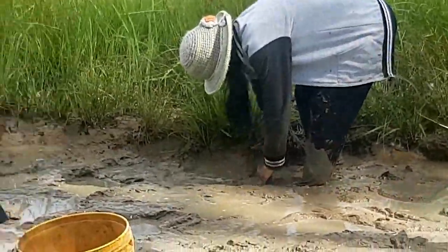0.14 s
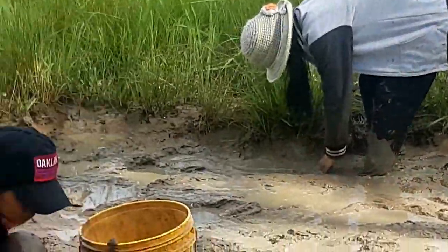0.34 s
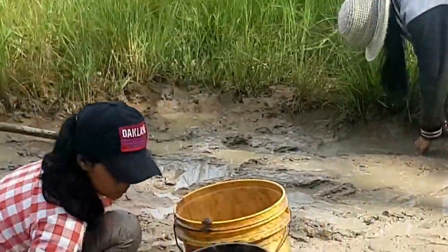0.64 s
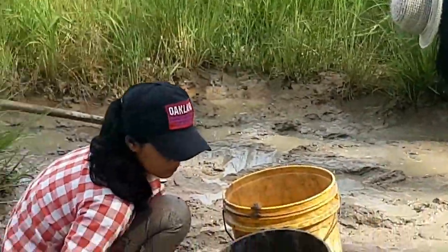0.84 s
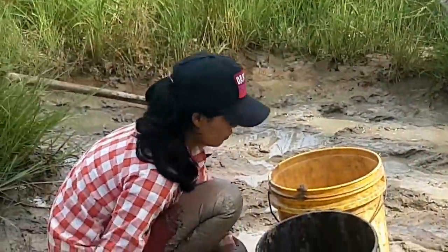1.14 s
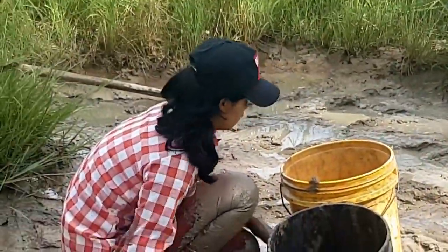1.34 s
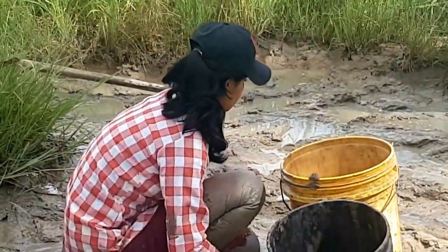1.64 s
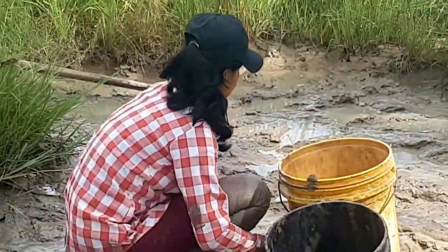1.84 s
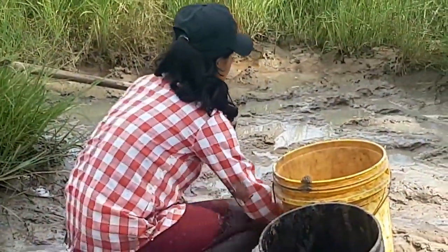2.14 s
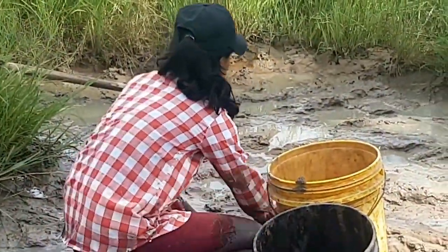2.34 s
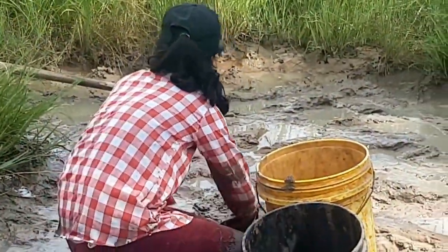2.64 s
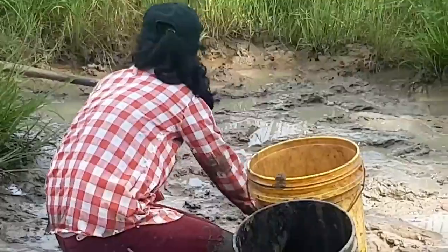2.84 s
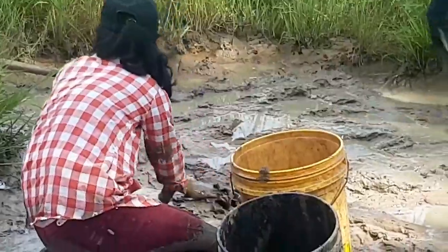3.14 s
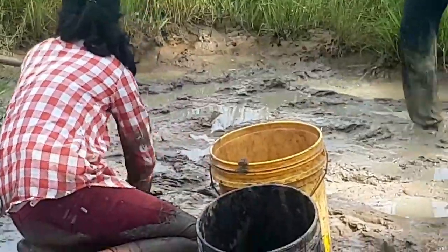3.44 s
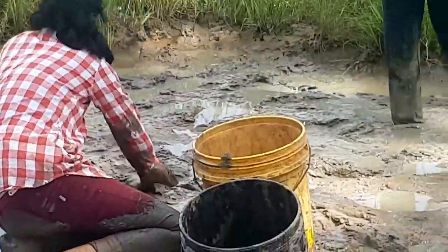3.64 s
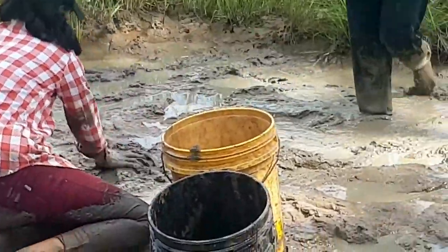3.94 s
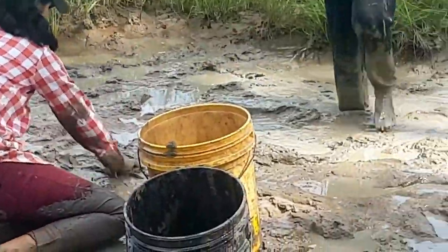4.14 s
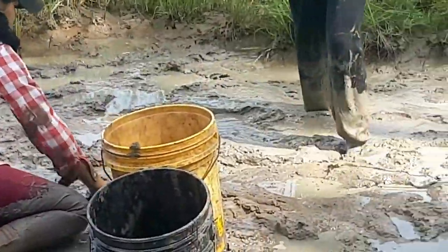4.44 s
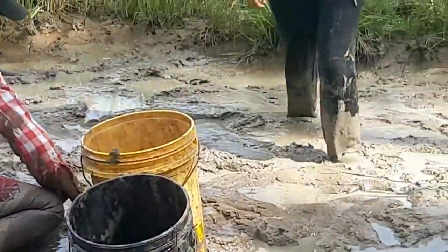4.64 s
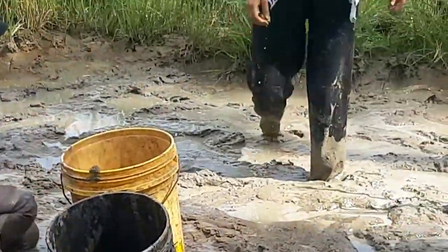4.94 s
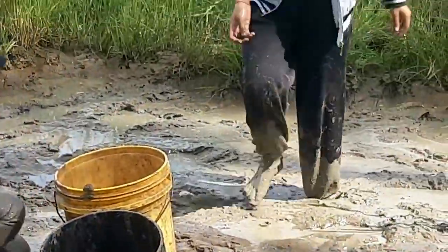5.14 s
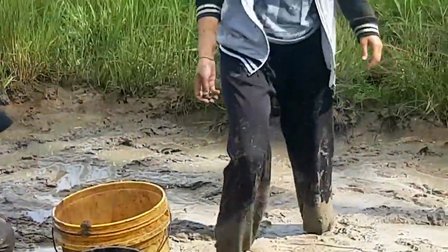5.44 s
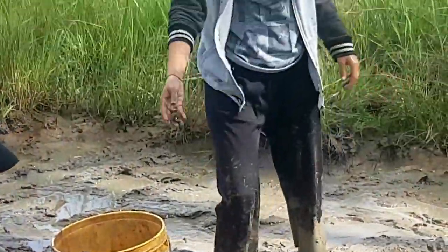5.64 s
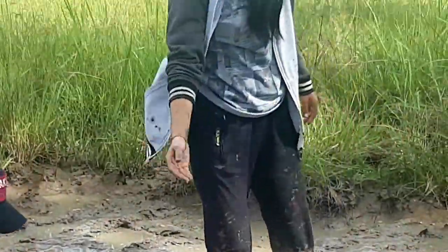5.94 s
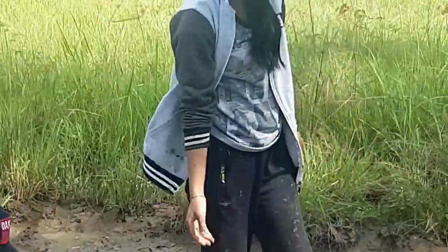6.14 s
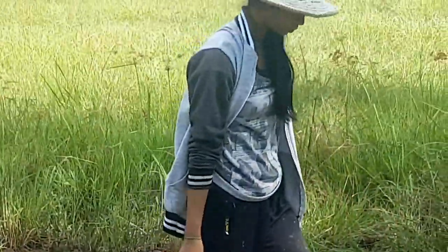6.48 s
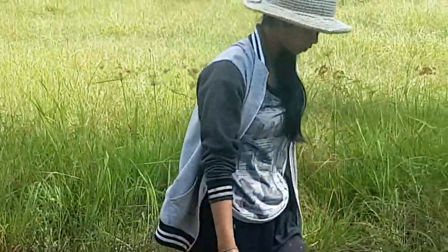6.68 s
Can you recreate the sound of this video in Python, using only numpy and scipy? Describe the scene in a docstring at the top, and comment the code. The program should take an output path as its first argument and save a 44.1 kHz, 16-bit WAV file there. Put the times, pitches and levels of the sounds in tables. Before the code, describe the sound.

An open, dry field ambience with the microphone close to the mud. From 0 s hands work through thick wet mud: sticky squelches, fine gritty crackle, small smacks and hollow or bright pops, with a brief low breeze at the start. A distant pump hums faintly throughout under a fluttering hollow tone and soft rumble. Two thin insect buzzes come at about 0.7 and 1.0 s. From 0.5 s a high, slightly hoarse bird gives six quick falling-note trills, ending near 1.1, 2.1, 3.1, 4.2, 5.1 and 6.1 s. Mud pops cluster around 1.4 s, thin out from 2 to 3 s, then snap at 3.5 s. From 4.9 to 5.9 s someone wades close, squelching heavily with cloth rustle. At 6.14 s a hard catch knocks a plastic bucket, hits the bottom and rattles until 6.3 s, amid sharp wet smacks. Mud stirs again at 6.6 s as low wind rises until 6.8 s.

```python
"""Two people grope by hand through the mud of a drained pond beside a grass field.
From the start, wet mud squelches (ringing air pockets), crackles and smacks (short bits of noise) and pops.
All the while a far pump drones (wavering sines) over a hollow background tone (narrow-band noise).
From about half a second a bird trills six times (falling tones); an insect buzzes twice (narrow noise).
Near five seconds one person wades closer with rustling clothes, then tosses a hard little catch into a
plastic bucket (ringing modes); a breeze (patchy noise), felt briefly at the start, gets up again."""
import sys
import numpy as np
from scipy import signal
from scipy.io import wavfile
from scipy.ndimage import uniform_filter1d

SR = 44100
rng = np.random.default_rng(int(sys.argv[2]) if len(sys.argv) > 2 else 0)


def put_to_file(sound):
    """Save the sound as 16-bit audio at rate SR, in the file named by the first command-line argument."""
    columns = np.atleast_2d(sound).T  # one column per channel
    safe = np.clip(columns, -1, 1)
    whole_steps = np.round(safe * 32767)
    wavfile.write(sys.argv[1], SR, whole_steps.astype(np.int16))


N = 300321
TIME = np.arange(N) / SR


def from_db(db):
    """Turn decibels into gain."""
    return 10 ** (np.asarray(db) / 20)


def rms_one(x):
    """Scale to unit power."""
    return x / np.sqrt(np.mean(x ** 2) + 1e-20)


def in_time(rows):
    """Draw straight lines between the rows: each column after the time, at every sample."""
    s, *columns = np.transpose(rows)
    return [np.interp(TIME, s, column) for column in columns]


def at_hz(points, hz):
    """Read a curve over frequency, on a logarithmic frequency axis."""
    points = np.array(points)
    return np.interp(np.log(hz), np.log(points[:, 0]), points[:, 1])


def noise(*shape):
    """Make white noise of spread 1."""
    return rng.standard_normal(shape)


def band(x, low_hz, high_hz, order=2):
    """Keep only the frequencies between two limits (Butterworth band-pass)."""
    edges = [low_hz, min(high_hz, .45 * SR)]
    return signal.sosfilt(signal.butter(order, edges, "band", fs=SR, output="sos"), x + 1e-18)


def drift(rate):
    """Wander at random with spread 1, through 2 * rate new points a second."""
    knots = noise(int(2 * rate * N / SR) + 2)
    return rms_one(np.interp(TIME * 2 * rate, np.arange(len(knots)), knots))


def add(out, s, sound):
    """Mix a stereo sound in at time s."""
    i = int(np.clip(round(s * SR), 0, N - 1))
    out[:, i:i + sound.shape[1]] += sound[:, :N - i]


# the left microphone port hears more treble: (frequency [Hz], left minus right [dB])
LEFT_RIGHT_LEAN = [(60, -1), (300, -1.5), (900, -1), (1500, 3), (2400, 3.5), (4000, 5), (15000, 5)]


def lean(hz):
    """Left and right gain at a frequency, half of the lean on each side."""
    return from_db(at_hz(LEFT_RIGHT_LEAN, hz) * np.array([[.5], [-.5]]))


# how alike left and right are in the open air: (frequency [Hz], likeness [0-1])
LEFT_RIGHT_LIKENESS = [(30, 0.8), (70, 1), (150, 1), (300, 0.97), (650, 0.51), (1400, 0), (3000, 0),
                       (15000, 0)]


def coloured(source, spectrum, patchy_db):
    """Deal two mid-side sources to half-octave bands, each with its own level, flicker and width; rms 1."""
    out = 0
    edges = 23 * 2 ** np.arange(0, 9.6, .5)
    for k, (low_hz, high_hz) in enumerate(zip(edges, edges[1:])):
        mid, side = band(source[k % 2], low_hz, high_hz)
        hz = np.sqrt(low_hz * high_hz)
        alike = np.clip(at_hz(LEFT_RIGHT_LIKENESS, hz), -1, 1)
        pair = np.sqrt(1 + alike) * mid + np.sqrt(1 - alike) * side * np.array([[1], [-1]])
        level_db = at_hz(spectrum, hz) + patchy_db * drift(11)
        out = out + pair * lean(hz) * from_db(level_db)
    return rms_one(out)


def burst(t60, low_hz, high_hz):
    """A brief spray of noise that drops 60 dB in t60 seconds, partly shared by both ears."""
    t = np.arange(SR // 8) / SR
    spray = (noise(len(t)) + noise(2, len(t))) / np.sqrt(2)
    # a narrow band keeps less of the noise, so it is raised to match
    gain = np.sqrt(SR / 2 / (high_hz - low_hz))
    fading = band(spray * from_db(-60 * t / t60), low_hz, high_hz)
    return lean(np.sqrt(low_hz * high_hz)) * gain * fading


def banks(x, wet_db, t60):
    """Ground, banks and bodies scatter a short dull tail, different at each ear."""
    t = np.arange(SR // 4) / SR
    tail = band(noise(2, len(t)), 133, 5100) * from_db(-60 * t / t60) * (t > .002)
    tail /= np.sqrt(np.sum(tail ** 2, axis=1, keepdims=True))
    return x + from_db(wet_db) * signal.fftconvolve(x, tail, axes=1)[:, :N]


# tone colour of the open field: (frequency [Hz], relative level [dB per Hz])
FIELD_SPECTRUM = [(15, -34), (25, -28), (33, -11), (78, -6.5), (185, -13.5), (416, -5.5), (591, -14),
                  (936, -4), (1290, -16), (2550, -17.5), (3820, -25), (6560, -24.5), (7710, -31),
                  (14400, -34), (16000, -44)]


def field_hush(level_db=-53.5):
    """The hush of the open field: steady noise, coloured band by band."""
    return from_db(level_db) * coloured(noise(2, 2, N), FIELD_SPECTRUM, patchy_db=0.4)


# far low rumble: (time [s], level [dB])
RUMBLE_LEVEL = [(0, -60), (1.0, -61), (1.9, -56.5), (2.9, -64), (4.3, -71), (4.9, -61), (6.81, -58)]


def far_rumble():
    """Low noise, mostly shared by both ears, that slowly swells and sinks."""
    level_db, = in_time(RUMBLE_LEVEL)
    return from_db(level_db) * rms_one(band(noise(N) + .5 * noise(2, N), 58, 174))


# hollow, narrow-band background tone around 900 Hz: (time [s], middle level [dB])
HOLLOW_LEVEL = [(0.2, -52.5), (1.2, -55.5), (2.0, -62), (4.3, -62), (5.85, -53), (6.81, -57)]


def hollow_tone(low_hz=780, high_hz=1040, flutter_db=2.0):
    """Noise in a narrow band around 900 Hz makes a hollow background tone; its level flutters."""
    level_db, = in_time(HOLLOW_LEVEL)
    tone = rms_one(band(noise(N) + 0.91 * noise(2, N), low_hz, high_hz))
    return from_db(level_db + flutter_db * drift(8.8)) * tone


# tone colour of the breeze: (frequency [Hz], relative level [dB per Hz])
BREEZE_SPECTRUM = [(25, -19), (45, -9.5), (80, -4), (150, -16.5), (300, -16), (800, -30.5), (3000, -60)]
# breeze on the microphone: (time [s], level [dB])
BREEZE_LEVEL = [(0, -52), (0.4, -84), (2.6, -71.5), (4.4, -69), (5.1, -54), (6.4, -52), (6.72, -43.5),
                (6.81, -49)]


def breeze():
    """Eddies of air strike each microphone port separately: patchy, mostly low noise."""
    level_db, = in_time(BREEZE_LEVEL)
    wind = [coloured(noise(2, 2, N), BREEZE_SPECTRUM, patchy_db=5.5)[ear] for ear in range(2)]
    return from_db(level_db) * np.array(wind)


# low orders of the far pump engine: (frequency [Hz], middle level [dB])
PUMP_ORDERS = [(71, -59.5), (107, -69), (142, -70)]


def pump(waver=.016):
    """A far engine hums in a few steady orders, wavering in pitch and level on the air."""
    out = 0
    turn = TIME + np.cumsum(waver * drift(3.9)) / SR
    for hz, db in PUMP_ORDERS:
        gain = from_db(db + 2.0 * drift(3.4)) * np.sqrt(2)
        out = out + gain * np.sin(2 * np.pi * hz * turn) * lean(hz)
    return out


# insect buzzes: (start time [s], length [s], level [dB])
INSECT_BUZZES = [(0.72, .135, -64.5), (1.01, .125, -66)]


def insect(low_hz=7950, high_hz=8550):
    """A narrow band of high noise makes a rasp that swells and stops."""
    swell = 0
    for s, length, db in INSECT_BUZZES:
        u = np.clip((TIME - s) / length, 0, 1)
        swell = swell + from_db(db) * np.sqrt(np.sin(np.pi * u).clip(0))
    return swell * lean(high_hz) * rms_one(band(noise(2, N), low_hz, high_hz))


# bird trills: (time of the last note [s], middle level of its clear notes [dB])
BIRD_TRILLS = [(1.147, -60.5), (2.066, -62), (3.068, -61), (4.174, -62.5), (5.117, -64), (6.093, -65.5)]


def bird(top_hz=6950, bottom_hz=6180, note_s=0.045, period=.0585, soft_db=-8.0, uneven_db=1.5, rough=0.38):
    """Falling, slightly hoarse notes in a quick row: soft ones grow towards four clear ones, no two alike."""
    out = np.zeros((2, N))
    u = np.linspace(0, 1, int(note_s * SR))
    for s, db in BIRD_TRILLS:
        for k in range(12):  # counted back from the last note
            level, detune, late = noise(3)
            hz = top_hz + (bottom_hz - top_hz) * u + 50 * detune
            note = np.sin(np.pi * u) * np.sin(2 * np.pi * np.cumsum(hz) / SR)
            gain = from_db(db + soft_db * np.sqrt(k // 4) + uneven_db * level)
            start = s - k * period - note_s / 2 + 0.0015 * late
            add(out, start, gain * note * lean(top_hz))
    # fast level wobble makes it hoarse
    return out * (1 + rough * drift(350))


# the catch hits the bucket and tumbles:
# (time [s], relative level [dB], place [0 wall - 1 bottom], contact brightness [Hz])
BUCKET_HITS = [(6.1382, -10.5, 0.038, 5100), (6.1406, -19.5, 0.22, 4000), (6.1456, -18, 0.44, 3000),
               (6.1796, -7.5, 0.92, 3900), (6.2135, -23.5, 0.55, 4000), (6.2461, -26, 0.88, 2500),
               (6.2555, -33, 1, 2000), (6.2772, -20.5, 0.36, 844), (6.3249, -29, 0.8, 2470)]
# ringing modes of the bucket: (frequency [Hz], relative level struck on the wall [dB],
# relative level struck on the bottom [dB], time to fall by 60 dB [s])
BUCKET_MODES = [(247, -28.5, -37, 0.081), (370, -15.5, -25.5, 0.03), (473, -25, -19.5, 0.076),
                (620, -25, -16, 0.031), (718, -8.5, -15, 0.032), (894, -9, -11, 0.06),
                (1020, -12, -11, 0.041), (1215, -12, -5, 0.021), (1304, -14, 2.5, 0.025),
                (1526, -7.5, -10, 0.031), (1620, -20, -14.5, 0.035), (1810, -3.5, -7, 0.016),
                (2136, -4, -26, 0.054), (2260, -29, -8.5, 0.024), (2640, -15, -22, 0.046),
                (3460, -30, -19, 0.036), (4600, -26, -28, .025)]


def bucket(crack_db=-15.0, tick_db=-36.0, lag=0.000098):
    """Each hit rings the plastic; the place of the hit sets the share of every mode."""
    out = np.zeros((2, N))
    # the right ear hears the ringing lag seconds later
    t = np.maximum(np.arange(SR // 5) / SR - np.array([[0], [lag]]), 0)
    for s, db, place, bright_hz in BUCKET_HITS:
        ring = 0
        for k, (hz, wall_db, bottom_db, t60) in enumerate(BUCKET_MODES):
            mode_db = wall_db + np.clip(place, 0, 1) * (bottom_db - wall_db)
            # a softer contact rings the high modes less
            gain = (-1) ** k * from_db(mode_db) / np.hypot(1, hz / bright_hz)
            ring = ring + gain * lean(hz) * np.sin(2 * np.pi * hz * t) * from_db(-60 * t / t60)
        add(out, s, from_db(db) * ring)
        # the hard contact itself cracks
        add(out, s, from_db(db + crack_db) * burst(t60=0.028, low_hz=680, high_hz=max(bright_hz, 1200)))
        add(out, s, from_db(db + tick_db) * burst(t60=.02, low_hz=4000, high_hz=9400))
    return out


# the wader comes close and passes; scene() trims both levels:
# (time [s], squelch level before trim [dB], cloth rustle level before trim [dB])
WADER_LEVEL = [(4.8, -76, -74), (5.15, -51.5, -61), (5.42, -46.5, -53.5), (5.82, -44.5, -56.5),
               (6.0, -50.5, -60.5), (6.35, -50.5, -63), (6.65, -59, -69)]
# a hand or foot pushes through the mud; scene() trims both levels: (time of the hardest push [s],
# length [s], squelch level before trim [dB], fine wet crackle level before trim [dB])
MUD_STROKES = [(0.01, 0.085, -51.5, -61), (0.259, 0.37, -44, -57.5), (0.39, 0.095, -48.5, -64),
               (0.624, 0.12, -48, -58), (0.887, 0.14, -54.5, -64), (1.378, 0.53, -47.5, -61.5),
               (1.545, 0.081, -44.5, -57.5), (1.706, 0.055, -52, -53.5), (1.884, 0.03, -58.5, -54.5),
               (2.435, 0.056, -55, -70), (2.626, 0.058, -49.5, -54.5), (2.705, 0.13, -53.5, -79),
               (3.13, 0.18, -54.5, -65), (3.297, 0.19, -57.5, -58), (3.556, 0.17, -50, -64),
               (3.8, 0.24, -59, -68), (4.008, 0.22, -52.5, -61), (4.319, 0.075, -44, -53.5),
               (4.437, .14, -51.5, -66), (4.57, 0.19, -57, -60.5), (4.714, 0.21, -51, -57.5),
               (4.898, .11, -47, -59), (5.083, 0.36, -45.5, -58), (5.22, 0.083, -50, -56),
               (5.44, 0.052, -60, -47), (5.6, 0.13, -42, -56), (5.663, 0.1, -63, -52),
               (5.798, 0.061, -42, -49), (6.668, 0.058, -51, -55.5), (6.725, 0.11, -45.5, -54)]
RISE_SHARE, FALL_SHARE = .4, 0.73  # of a stroke's length: time to swell, time to ebb to 1/e
OOZE_DB, SEEP_DB = -63.5, -69.5  # squelch and crackle of the mud between strokes, before the same trim


def mud_work():
    """Squelch and crackle in dB: every stroke swells and ebbs, on top of the oozing mud and passing wader."""
    power = from_db(in_time(WADER_LEVEL)) ** 2 + from_db([[OOZE_DB], [SEEP_DB]]) ** 2
    for s, length, squelch_db, crackle_db in MUD_STROKES:
        u = (TIME - s) / length
        fade = np.where(u < 0, (u / RISE_SHARE) ** 2, u / FALL_SHARE)
        push = np.exp(-fade.clip(0, 20))
        power = power + (from_db([[squelch_db], [crackle_db]]) * push) ** 2
    return 10 * np.log10(power)


# tone colour of the wet ticks: (frequency [Hz], relative level [dB per Hz])
CRACKLE_SPECTRUM = [(200, 3), (400, 8.5), (1000, 8.5), (3000, 7), (5000, -0.5), (8000, -4), (12000, -4.5),
                    (16000, -11)]


def crackle(level_db, per_s=3600, spread_db=-0.5):
    """Tiny ticks of wet grit and rubbing cloth, uneven one by one but steady as a stream."""
    sizes = from_db(spread_db * np.minimum(rng.exponential(1, N), 4))
    chosen = rng.random(N) < per_s / SR
    ticks = coloured(sizes * chosen * noise(2, 2, N), CRACKLE_SPECTRUM, patchy_db=1.15)
    # divide by the running level, so that level_db alone shapes the stream
    power = uniform_filter1d(np.mean(ticks ** 2, axis=0), size=2000)
    return from_db(level_db) * ticks / np.sqrt(power + 1e-6)


# sharp wet smacks and spatter: (time [s], level before the trim in smacks() [dB])
WET_SMACKS = [(0.033, -44), (0.393, -43), (1.494, -42), (3.343, -42.5), (3.556, -41), (3.7091, -37),
              (4.034, -45), (4.33, -40), (4.542, -43), (5.17, -38.5), (5.355, -38), (5.456, -32),
              (5.674, -38), (5.81, -34.5), (6.214, -25), (6.228, -26.5), (6.582, -38), (6.7434, -31)]


def smacks(crackle_db, trim_db=-7.0, stray_per_s=4, over_db=16.5):
    """Films of wet mud snap apart: a click with a thin top. Others come at random, as loud as the crackle asks."""
    out = np.zeros((2, N))
    strays = []
    for when in rng.random(int(stray_per_s * N / SR)):
        strays.append((when * N / SR, crackle_db[int(when * N)] + over_db))
    for s, db in list(WET_SMACKS) + strays:
        click = burst(t60=0.024, low_hz=2120, high_hz=6150)
        thin_top = from_db(-7) * burst(t60=0.029, low_hz=4970, high_hz=13400)
        add(out, s, from_db(db + trim_db) * (click + thin_top))
    return out


def bubble(hz, cycles, rise, lag):
    """An air pocket rings for some cycles, its pitch rising as it opens; the right ear hears it lag s later."""
    t60 = cycles / hz
    delay = np.array([[max(-lag, 0)], [max(lag, 0)]])
    t = np.maximum(np.arange(int(t60 * SR) + 32) / SR - delay, 0)
    swell = 1 - np.exp(-2 * hz * t)
    ring = np.sin(2 * np.pi * hz * t * (1 + rise * t / t60))
    return lean(hz) * swell * from_db(-60 * t / t60) * ring


def stray_pops(squelch_db, per_s=20, over_db=9.5, follows=0.84, ref_db=-48.5, spread_db=2.5):
    """Middling pockets burst at random, harder where the mud is being worked; rows like BIG_POCKETS."""
    low_hz, high_hz = 1000, 4400
    level_db = ref_db + over_db + follows * (squelch_db - ref_db)
    pockets = []
    for when, size, pitch in rng.random((int(per_s * N / SR), 3)):
        db = level_db[int(when * N)] + spread_db * (2 * size - 1)
        pockets.append((when * N / SR, db, low_hz * (high_hz / low_hz) ** pitch))
    return pockets


# the largest air pockets that burst in the mud:
# (time [s], level before the trims in pops() [dB], starting pitch [Hz])
BIG_POCKETS = [(0.165, -35, 1390), (0.229, -35.5, 980), (0.347, -33.5, 1180), (0.383, -36, 1690),
               (0.639, -34, 940), (0.708, -31.5, 3080), (0.709, -35, 1030), (0.761, -37, 920),
               (0.879, -35.5, 1300), (1.05, -32.5, 2500), (1.359, -33.5, 2000), (1.431, -32.5, 3540),
               (1.441, -27, 1070), (1.495, -30, 2730), (1.496, -35, 1450), (1.511, -33, 2630),
               (1.7, -34, 1130), (2.095, -38, 1000), (2.6, -34.5, 3230), (3.244, -30.5, 2410),
               (3.555, -26, 1890), (3.709, -35.5, 3480), (3.711, -35.5, 1140), (3.809, -37, 1200),
               (3.922, -39, 2580), (3.996, -39, 950), (4.016, -33, 1100), (4.36, -35.5, 2640),
               (4.468, -36, 1740), (4.675, -33.5, 2210), (4.93, -32, 1230), (5.062, -28, 2870),
               (5.153, -32, 960), (5.402, -32, 1980), (5.488, -31, 2470), (5.584, -29, 1300),
               (5.858, -32.5, 3070), (6.583, -34, 1930), (6.66, -32, 2650), (6.741, -29.5, 4690)]


def pops(squelch_db, ring_db=3.5, cycles=14, rise=0.018, snap_db=-11.0, after_db=-17.0, after_s=0.025):
    """A large pocket snaps open and rings, and two softer ones of nearby pitch follow it."""
    out = np.zeros((2, N))
    for s, db, hz in list(BIG_POCKETS) + stray_pops(squelch_db):
        add(out, s, from_db(db + ring_db) * bubble(hz, cycles, rise, .00006))
        add(out, s, from_db(db + snap_db) * burst(t60=0.0099, low_hz=0.49 * hz, high_hz=1.4 * hz))
        for delay, octave in rng.random((2, 2)):
            after = bubble(hz * 2 ** (octave - .5), cycles / 2, rise, .0001)
            add(out, s + delay * after_s, from_db(db + after_db) * after)
    return out


# tone colour of the squelch: (pocket pitch [Hz], relative level [dB])
SQUELCH_SPECTRUM = [(300, -5.5), (600, -6), (830, 7.5), (1300, -3.5), (2000, 1.5), (3000, -7.5),
                    (4500, -13), (7000, -20)]


def squelch(level_db, per_s=900, spread_db=4.0, cycles=18, rise=0.066):
    """Countless small pockets open under fingers and feet, in a stream whose level wavers."""
    out = np.zeros((2, N))
    for when, pitch, size, damping, place, sign in rng.random((int(per_s * N / SR), 6)):
        hz = 360 * (6000 / 360) ** pitch
        size_db = spread_db * min(-np.log(1 - size), 3) + at_hz(SQUELCH_SPECTRUM, hz)
        # small pockets are brief, so they peak higher for the same power
        gain = np.sign(sign - .5) * hz * from_db(size_db)
        pocket = bubble(hz, cycles * (.5 + damping), rise, (place - .4) * 0.00055)
        add(out, when * N / SR, gain * pocket)
    # divide by the running level before the wanted level is put on
    even = out / np.sqrt(uniform_filter1d(np.mean(out ** 2, axis=0), size=3500) + 1e-9)
    return even * from_db(level_db + 1.58 * drift(20))


def scene():
    """The field around, the bucket, and the mud work near by."""
    field = field_hush() + far_rumble() + hollow_tone() + breeze() + pump() + insect() + bird()
    catch = banks(bucket(), wet_db=-17.0, t60=0.18)
    squelch_db, crackle_db = mud_work()
    mud = squelch(squelch_db - 4.0) + pops(squelch_db) + smacks(crackle_db)
    return field + catch + banks(mud, wet_db=-5.5, t60=0.058) + crackle(crackle_db + 5.0)


def record(dry):
    """The top is cut steeply above 15900 Hz."""
    return signal.sosfilt(signal.ellip(10, .2, 80, 15900, fs=SR, output="sos"), dry)


dry = scene()
out = record(dry)
put_to_file(out)
```